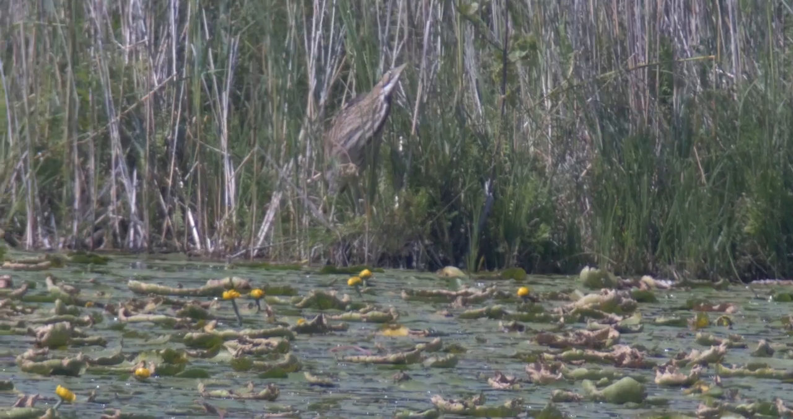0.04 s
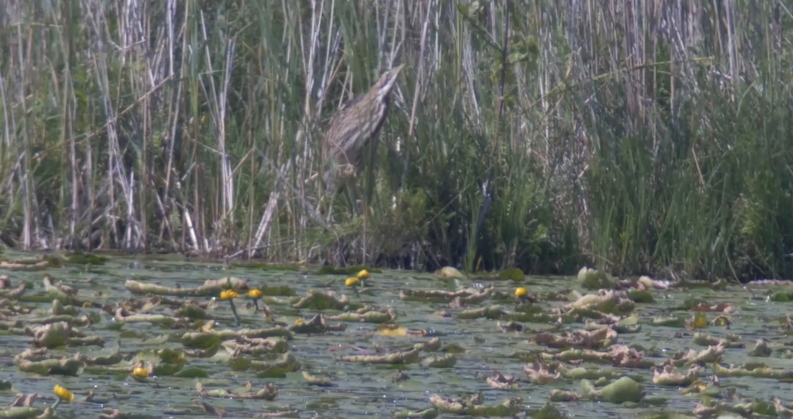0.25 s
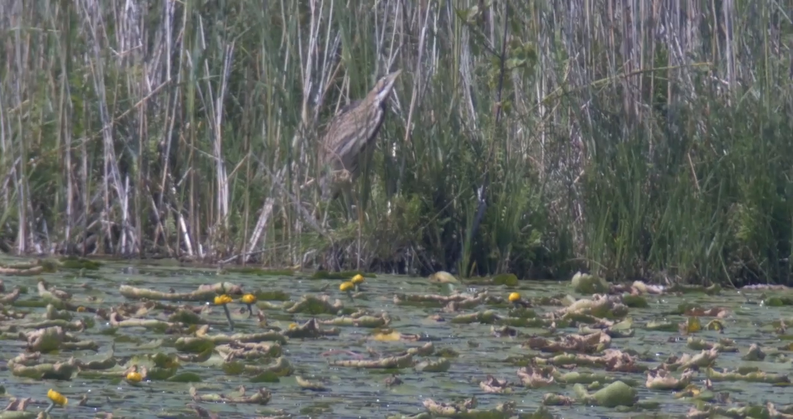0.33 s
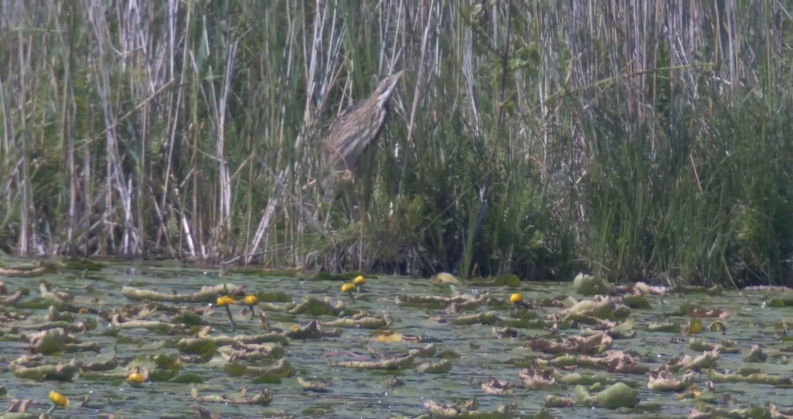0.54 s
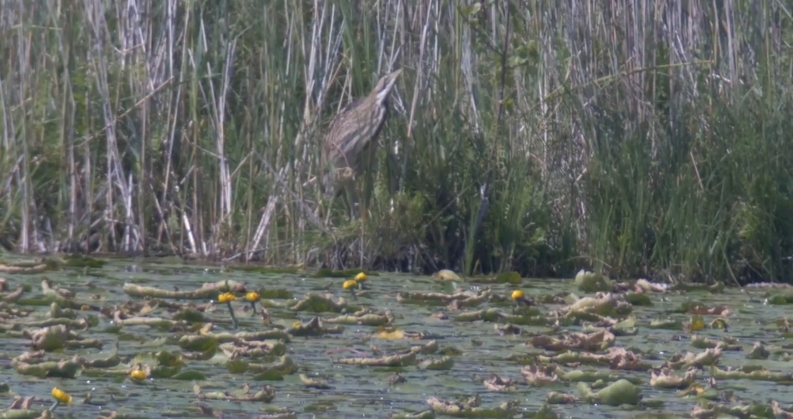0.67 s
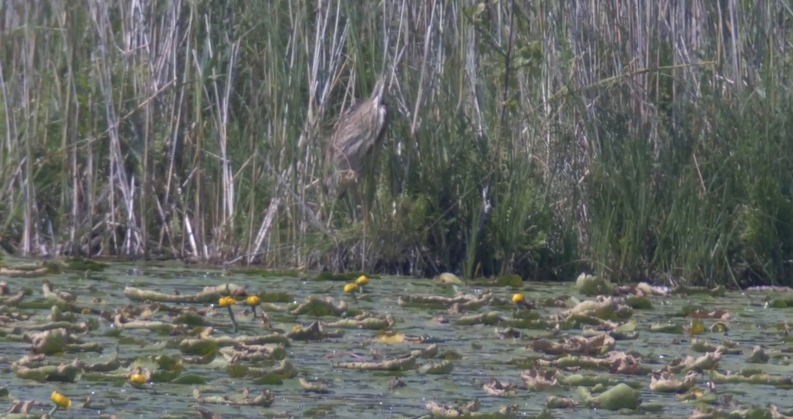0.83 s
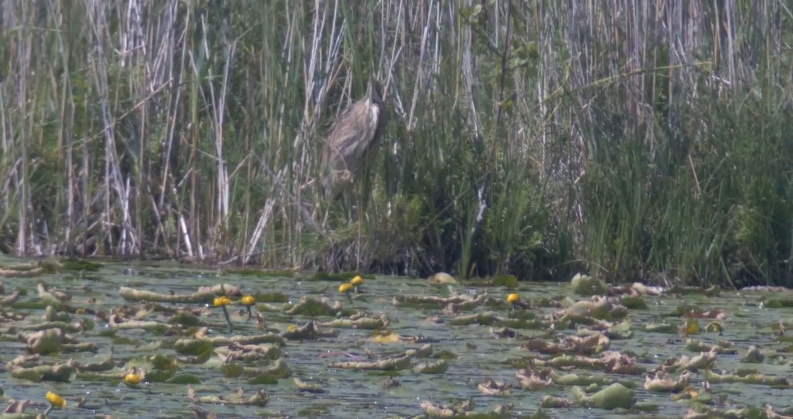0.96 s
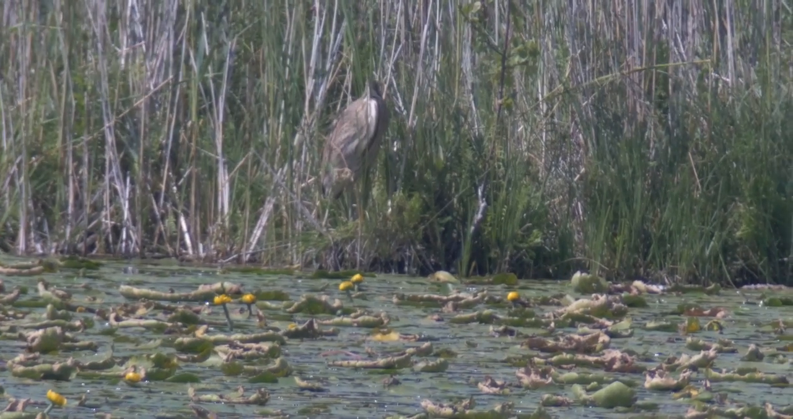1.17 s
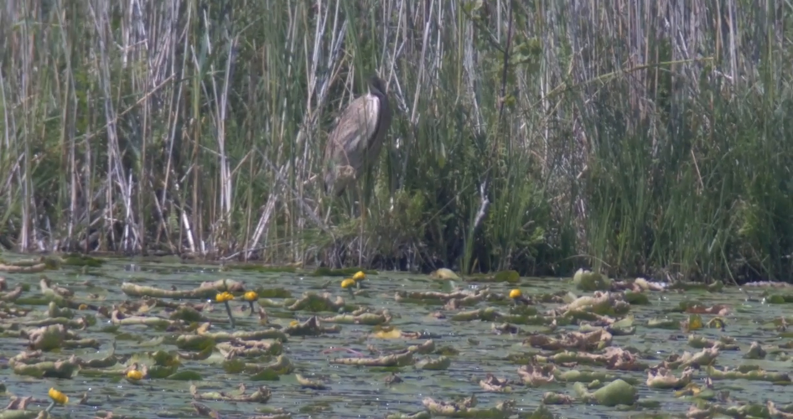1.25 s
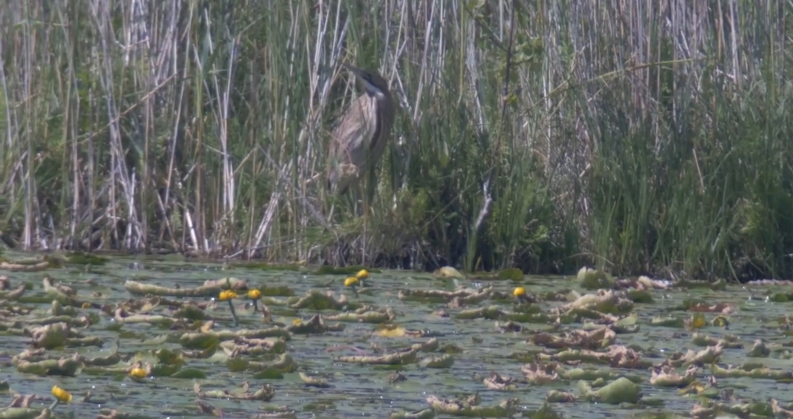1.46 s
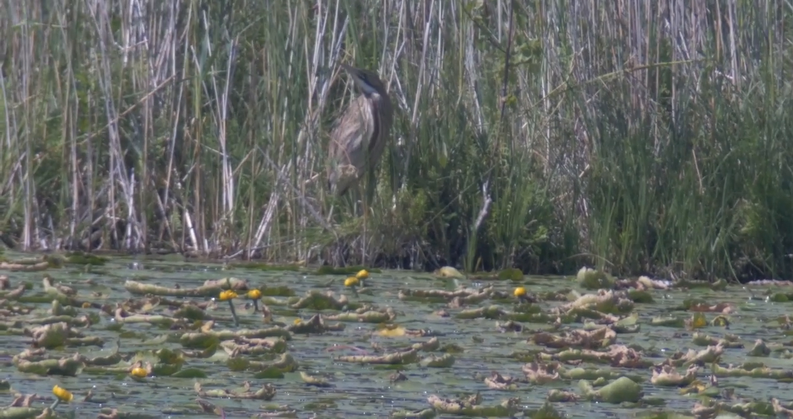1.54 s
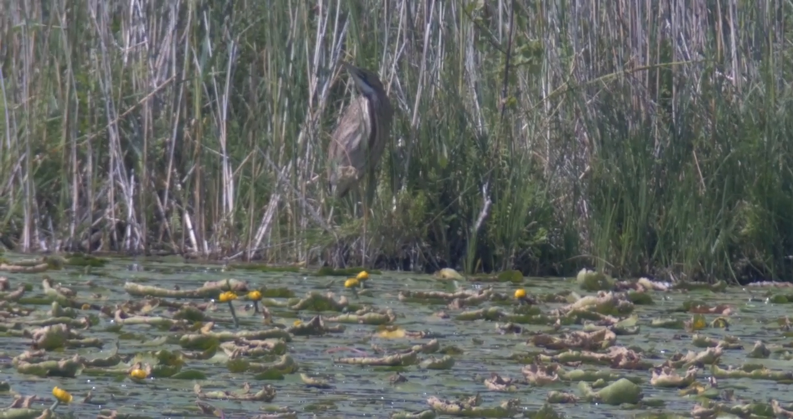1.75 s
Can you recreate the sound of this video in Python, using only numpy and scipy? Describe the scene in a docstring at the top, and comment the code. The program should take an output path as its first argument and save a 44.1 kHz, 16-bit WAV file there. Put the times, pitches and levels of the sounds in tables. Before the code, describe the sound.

Gusts thump on the microphone outdoors while a hand rubs it and a distant bird calls.

```python
"""Wind and handling by a reed bed

Eddies buffet a hand-held camera, thumping mostly on its right port, over an airy hush and a faint hum.
A hand slides on the body three times, a hiss with a fine stick-slip judder, and the grip creaks softly.
A distant small bird rasps (noise bands), then whistles (a wavering tone), scattered by the reeds.
At the end a far water bird starts a nasal note of two harmonics."""
import sys
import numpy as np
from scipy import signal
from scipy.fft import rfft, irfft
from scipy.io import wavfile
from scipy.ndimage import uniform_filter1d, map_coordinates

SR = 44100
rng = np.random.default_rng(int(sys.argv[2]) if len(sys.argv) > 2 else 0)


def transcribe(u):
    """Save the signal u as a 16-bit wav file named by the first command-line argument.

    u: samples, shape (n,) or (channels, n), limited to [-1, 1]; the rate is SR.
    q: integer samples, one column per channel.
    """
    v = np.clip(np.atleast_2d(u).T, -1, 1)
    q = np.round(v * 32767).astype(np.int16)
    wavfile.write(sys.argv[1], SR, q)


N = 79380
T = np.arange(N) / SR
HZ = np.fft.rfftfreq(N, 1 / SR)

# tone of the outdoor hush (frequency [Hz], relative level [dB])
HUSH_SPECTRUM = [(20, -29), (60, 9.5), (150, -6.5), (300, -3), (600, -8.5), (1000, -10.5), (2200, -12),
                 (3250, -22), (4000, -15), (4700, -18), (5400, -24), (8000, -29), (10500, -27),
                 (15500, -40)]
# how alike the two ports hear the hush (frequency [Hz], correlation [0-1])
HUSH_LIKENESS = [(50, .7), (300, 0.92), (900, 0), (8000, 0), (12000, .6)]
# swell of the wind on the microphone (time [s], relative level [dB])
WIND_SWELL = [(.07, -55.5), (.15, -46), (.2, -35), (.275, -39), (.31, -30), (.52, -33.5), (.57, -50.5),
              (.744, -45.5), (.88, -37), (.94, -36.5), (1.04, -33), (1.2, -30), (1.28, -32.5),
              (1.42, -37.5), (1.6, -47), (1.67, -50.5), (1.8, -53.5)]
# tone of the eddies at the port (frequency [Hz], relative level [dB])
EDDY_SPECTRUM = [(35, -11.5), (80, -3), (125, 2), (165, 1), (320, -8), (450, -16.5), (650, -33.5),
                 (1000, -39), (2000, -100)]
# wind at the sheltered left port against the right (frequency [Hz], gain [dB])
WIND_LEFT_EQ = [(50, -15), (130, -10), (280, -20.5)]
# soft creaks of the grip (start [s], length [s], start pitch [Hz], end pitch [Hz], level [dB])
GRIP_CREAKS = [(.04, 0.26, 1820, 2050, -46.5), (.24, 0.16, 1855, 1612, -45.5), (.58, 0.41, 1852, 1801, -50),
               (.87, 0.29, 1854, 1923, -41.5), (1.12, 0.227, 1896, 1828, -46.5),
               (1.45, 0.27, 2100, 1797, -47.5)]
# noise bands of a creak (pitch multiple [ratio], width [Hz], gain [dB])
CREAK_BANDS = [(1, 510, 0), (1.469, 710, -12)]
# slides of the hand (start [s], length [s], level before fades [dB], opening treble lift [dB])
HAND_SLIDES = [(.09, 0.27, -44, 0), (0.848, .3, -42, 2), (1.428, .255, -40.5, 5)]
# friction hiss through the camera body (frequency [Hz], relative level [dB])
FRICTION_SPECTRUM = [(100, -46), (500, -5), (700, -12.5), (1500, -13.5), (2300, 0.5), (3300, -4.5),
                     (4200, 5), (5350, -6), (6900, -4), (7800, -12.5), (8700, -9.5), (11000, -17),
                     (15500, -32)]
# resonances of the body (frequency [Hz], width [Hz], level above the hiss [dB])
BODY_RESONANCES = [(903, 190, 19), (1218, 101, 25), (1920, 230, 16), (4723, 190, 10.5), (6040, 580, 2.5)]
# body sounds at the left port against the right (frequency [Hz], gain [dB])
BODY_LEFT_EQ = [(500, -4.5), (1300, -9), (3200, -5), (4800, -5), (6500, 0), (12000, -1)]
# how far the left port leads on body sounds (frequency [Hz], phase [rad])
BODY_LEFT_LEAD = [(600, 3.8), (1400, 1.13), (2000, 1.88), (4500, 2.2), (6400, 3.2), (10500, 0.31)]
# how alike the two ports hear the friction (frequency [Hz], correlation [0-1])
FRICTION_LIKENESS = [(300, 0.37), (1500, 0.13), (5000, 0.17), (9000, 0.85)]
# hard puffs on the port (time [s], peak before overload and low cut [dB], pitch [Hz], half length [s])
HARD_PUFFS = [(0.201, -20.5, 211, 0.008), (0.297, -11.5, 280, 0.0026), (0.304, -10.5, 129, 0.0075),
              (.349, -8.5, 326, 0.0021), (.353, -7.5, 218, 0.0024), (.387, -8, 254, 0.0026),
              (0.396, -8.5, 210, 0.0027), (.414, -16, 197, 0.0068), (.507, -17, 167, 0.01),
              (0.881, -20, 117, 0.011), (.978, -16, 146, 0.005), (1.002, -16, 207, 0.0077),
              (1.026, -16.5, 275, 0.003), (1.036, -9.5, 213, 0.002), (1.064, -13, 150, 0.0061),
              (1.096, -17, 172, 0.0032), (1.164, -12, 230, 0.0018), (1.185, -14.5, 159, 0.0076),
              (1.22, -7, 232, 0.0025), (1.302, -24, 347, 0.0029), (1.31, -18.5, 176, 0.0048),
              (1.347, -15.5, 194, 0.0069), (1.408, -18.5, 241, .0025), (1.427, -15, 194, 0.0038),
              (1.48, -19, 208, 0.002), (1.546, -18.5, 150, 0.005), (1.62, -24.5, 133, 0.0076)]
# rasping bird syllables (start [s], length [s], start pitch [Hz], end pitch [Hz], level [dB])
BIRD_RASPS = [(.312, 0.063, 3473, 3973, -39.5), (.385, 0.067, 3830, 3686, -41.5),
              (.448, 0.03, 3740, 3656, -42), (.472, 0.034, 3610, 3480, -41),
              (.505, 0.09, 3715, 3600, -42.5), (.578, 0.064, 3593, 3400, -41.5),
              (.628, 0.054, 2875, 2767, -49), (1.285, 0.038, 3237, 3670, -45.5),
              (1.478, 0.029, 3120, 3100, -45)]
# noise bands of a rasp (pitch multiple [ratio], width [Hz], gain [dB])
RASP_BANDS = [(1, 680, -1), (.81, 830, -6.5), (1.3, 1270, -9), (2.1, 5000, -16)]
# whistled bird phrases, a list of points each (time [s], pitch [Hz], level [dB])
WHISTLE_PHRASES = [
    [(1.3, 4000, -51), (1.325, 4630, -47.5), (1.338, 4930, -54), (1.365, 5180, -62), (1.381, 5250, -60),
     (1.389, 4310, -46), (1.4, 4160, -43.5), (1.418, 5330, -56), (1.43, 4140, -44)],
    [(1.431, 3360, -46), (1.438, 3090, -41.5), (1.447, 3400, -48), (1.452, 3945, -47.5), (1.475, 4700, -56)],
]
# harmonics of the water bird's note (pitch multiple [ratio], level [dB])
CALL_HARMONICS = [(1, -56.5), (2, -50)]


def amp(db):
    """Decibels to gain."""
    return 10 ** (np.asarray(db) / 20)


def unit(x):
    """Scales to rms 1."""
    return x / np.sqrt(np.mean(x ** 2) + 1e-20)


def curve(points):
    """Joins a table's points along a log frequency axis."""
    hz, value = np.transpose(points)
    return np.interp(np.log(HZ + 1), np.log(hz + 1), value)


def low_pass(x, hz):
    """Rolls off the top above a corner frequency."""
    return irfft(rfft(x) / (1 + (HZ / hz) ** 4), N)


def wander(hz):
    """Smooth random motion up to a rate, rms 1."""
    return unit(low_pass(rng.standard_normal(N), hz))


def phase(hz):
    """Running phase of a pitch curve, in radians."""
    return 2 * np.pi * np.cumsum(hz) / SR


def noise_pair(gain, likeness):
    """Coloured noise at two partly alike ports, rms 1 on the right."""
    right, other = rfft(rng.standard_normal((2, N)))
    left = likeness * right + np.sqrt(1 - likeness ** 2) * other
    pair = irfft(np.array([left, right]) * gain, N)
    return pair / np.std(pair[1])


def noise_band(hz, width_hz):
    """A band of noise riding a pitch curve."""
    turn = phase(hz)
    return unit(wander(width_hz / 2) * np.cos(turn) + wander(width_hz / 2) * np.sin(turn))


def glides(bursts, bands):
    """Arched bursts of noise bands that slide in pitch together."""
    out = np.zeros(N)
    for start, length, from_hz, to_hz, db in bursts:
        progress = np.clip((T - start) / length, 0, 1)
        pitch = from_hz + (to_hz - from_hz) * progress
        stack = sum(amp(band_db) * noise_band(ratio * pitch, width) for ratio, width, band_db in bands)
        out += amp(db) * np.sqrt(abs(np.sin(np.pi * progress))) * stack
    return out


def hush():
    """A bed of air over reeds and water, slowly easing."""
    level_db, fade_db_per_s, left_dip_db = -44.5, 1.15, -4
    left_eq = curve(BODY_LEFT_EQ)
    left = amp(left_dip_db * left_eq / np.min(left_eq))  # the body's left-port curve, made shallower
    colour = amp(curve(HUSH_SPECTRUM)) * np.array([left, np.ones(len(HZ))])
    return amp(level_db - fade_db_per_s * T) * noise_pair(colour, curve(HUSH_LIKENESS))


def hum():
    """A faint low tone in the centre, unsteady in pitch and level as it fades."""
    pitch_hz, waver_hz = 264.5, 12.9
    level_db, fade_db_per_s, flutter_db = -45, 4.5, 4.7
    pitch = pitch_hz + waver_hz * wander(hz=19.5)
    return amp(level_db - fade_db_per_s * T + flutter_db * wander(hz=8.5)) * np.sin(phase(pitch))


def wind_at_ports(pair, low_cut_hz=66):
    """Wind passes the microphone's low cut; the sheltered left port gets a weaker, duller share."""
    low_cut = signal.butter(4, low_cut_hz, "high", fs=SR, output="sos")
    left, right = signal.sosfilt(low_cut, pair)
    return np.array([irfft(rfft(left) * amp(curve(WIND_LEFT_EQ)), N), right])


def wind():
    """Lumpy eddies buffet the ports; stronger gusts are also brighter."""
    boost_db, lump_db = 6, 3
    neutral_db, brighten_db_per_db = -30.5, 0.9
    strength_db = np.interp(T, *np.transpose(WIND_SWELL)) + lump_db * wander(hz=63.5)
    eddies = noise_pair(amp(curve(EDDY_SPECTRUM)), likeness=0.75)
    rumble = low_pass(eddies, hz=278)
    top = (eddies - rumble) * amp(brighten_db_per_db * (strength_db - neutral_db))
    return wind_at_ports(amp(boost_db + strength_db) * (rumble + top))


def grip_creaks(left_response):
    """The grip creaks softly through the body in gliding bands of noise."""
    creaks = glides(GRIP_CREAKS, CREAK_BANDS)
    return np.array([irfft(rfft(creaks) * left_response, N), creaks])


def hand_slide(colour, start, length, db, treble_db):
    """One slide catches brightly, dulls and lets go; the resonances bend up and back with the grip."""
    attack_s, release_s, bend_depth = 0.081, 0.084, 0.06
    sag_db_per_s, treble_sag_db_per_s = 4, 22.5
    t = np.clip(T - start, 0, length)
    fades = np.minimum(t / attack_s, 1) * np.minimum((length - t) / release_s, 1)
    speed = 1 + bend_depth * (np.sin(np.pi * t / length) - np.pi / 4)  # bends up mid-slide and back, averaging just under 1 over the slide
    friction = noise_pair(colour, curve(FRICTION_LIKENESS))
    hiss = np.array([map_coordinates(port, [np.cumsum(speed)], mode="wrap") for port in friction])
    dull = low_pass(hiss, hz=4100)
    treble = (hiss - dull) * amp(treble_db - treble_sag_db_per_s * t)
    return amp(db - sag_db_per_s * t) * fades * (dull + treble)


def handling():
    """Skin slides on the camera body in a fast stick-slip judder and excites its resonances."""
    judder_hz, judder_db, slip_db = 65, 2.4, 0.4
    resonance_power = 1 + sum(amp(db) ** 2 / (1 + (2 * (HZ - hz) / width) ** 2) ** 2
                              for hz, width, db in BODY_RESONANCES)
    left_response = amp(curve(BODY_LEFT_EQ)) * np.exp(1j * curve(BODY_LEFT_LEAD))
    ports = np.array([left_response, np.ones(len(HZ))])
    colour = amp(curve(FRICTION_SPECTRUM)) * np.sqrt(resonance_power) * ports
    rubbing = sum(hand_slide(colour, *slide) for slide in HAND_SLIDES) + grip_creaks(left_response)
    judder = np.sin(phase(judder_hz * (1 + 0.05 * wander(hz=41))))
    return rubbing * amp(slip_db * wander(hz=88.5) + judder_db * judder)


def puffs():
    """Single hard eddies overpressure the port: low thumps that fall in pitch; the hardest distort."""
    pitch_sag_per_s, overload = 24.4, 0.7
    thumps = np.zeros(N)
    for peak_s, db, hz, half_length in HARD_PUFFS:
        t = T - peak_s
        cycles = hz * (t - pitch_sag_per_s * t ** 2 / 2)
        thumps += amp(db) * np.exp(-(t / half_length) ** 2) * np.cos(2 * np.pi * (cycles + rng.random()))
    driven = thumps + overload * thumps ** 2
    return wind_at_ports([driven, driven])


def small_bird():
    """A distant bird rasps, then whistles, louder on the right; the reeds scatter a short tail."""
    reeds_t60_s, wet_db, left_lead_s = 0.25, -9, 0.00006
    song = glides(BIRD_RASPS, RASP_BANDS) + sum(whistle(phrase) for phrase in WHISTLE_PHRASES)
    tail = rng.standard_normal((2, N)) * np.exp(-np.log(1000) * T / reeds_t60_s)
    scatter = signal.fftconvolve(song[None], tail / np.linalg.norm(tail[0]), axes=1)[:, :N]
    direct = np.array([np.interp(T + left_lead_s, T, song), song])
    return pan_right(direct, left_db=-9) + amp(wet_db) * pan_right(scatter, left_db=-1.5)


def pan_right(x, left_db):
    """Leans a sound to the right by turning the left port down."""
    return x * np.array([[amp(left_db)], [1]])


def whistle(phrase):
    """The small bird's thin tone follows a phrase, wavering fast in pitch and level."""
    warble_depth, warble_hz, flutter_db = 0.045, 400, 3
    times, hz, db = np.transpose(phrase)
    pitch = np.interp(T, times, hz) * (1 + warble_depth * wander(warble_hz))
    gate = (T > times[0]) & (T < times[-1])
    envelope = uniform_filter1d(amp(np.interp(T, times, db)) * gate, size=130)  # 3 ms soft edges
    return np.sqrt(2) * envelope * amp(flutter_db * wander(warble_hz)) * np.sin(phase(pitch))


def water_bird():
    """A far bird holds a nasal note, its second harmonic the strongest."""
    start_s, attack_s, pitch_hz, waver_hz, flutter_db = 1.715, 0.05, 778, 17, 2
    turn = phase(pitch_hz + waver_hz * wander(hz=118))
    note = np.sqrt(2) * sum(amp(db) * np.sin(multiple * turn) for multiple, db in CALL_HARMONICS)
    fade_in = np.clip((T - start_s) / attack_s, 0, 1)
    return pan_right(fade_in * amp(flutter_db * wander(hz=69)) * note, left_db=-8)


def scene():
    """Wind, hand and birds over the bed of hush and hum."""
    return hush() + hum() + wind() + handling() + puffs() + small_bird() + water_bird()


def record(dry):
    """The mix snaps open after a moment of silence and passes a steep high cut."""
    open_s, fade_s, high_cut_hz = 0.065, 0.0033, 15450
    opened = dry * np.clip((T - open_s) / fade_s, 0, 1)
    high_cut = signal.firwin(511, high_cut_hz, window=("kaiser", 9), fs=SR)
    return signal.oaconvolve(opened, high_cut[None], "same")


dry = scene()
out = record(dry)
transcribe(out)
```